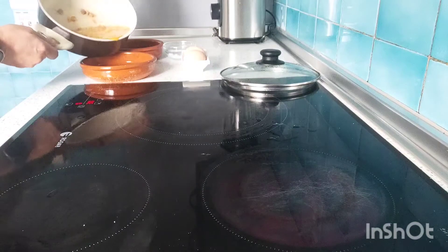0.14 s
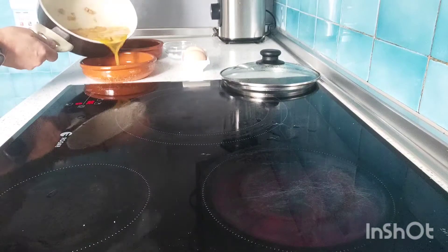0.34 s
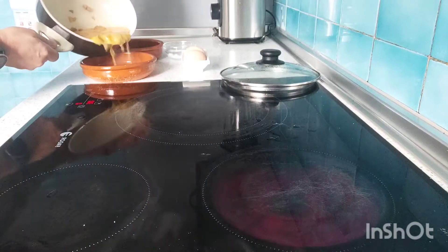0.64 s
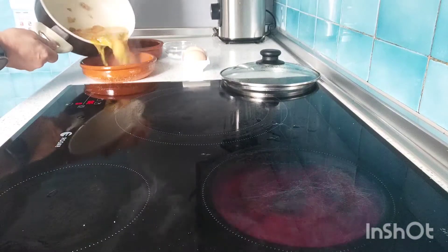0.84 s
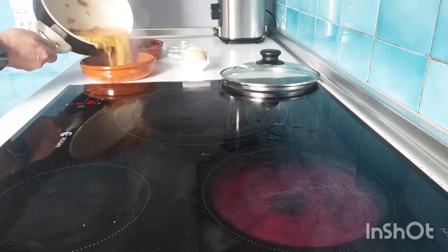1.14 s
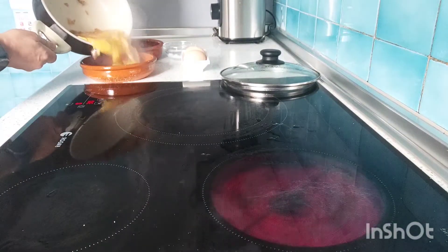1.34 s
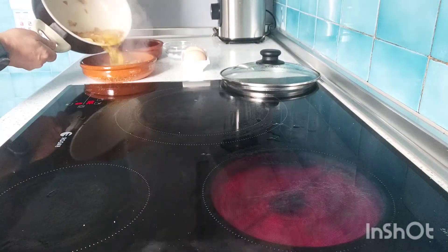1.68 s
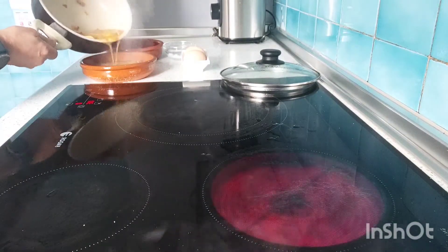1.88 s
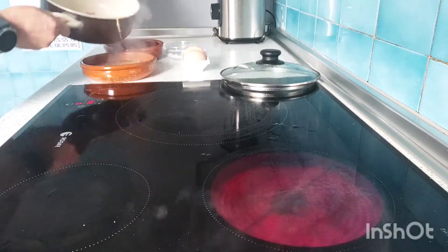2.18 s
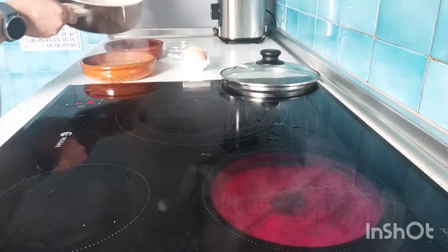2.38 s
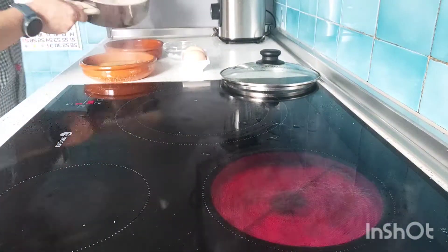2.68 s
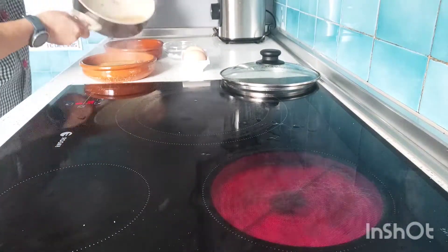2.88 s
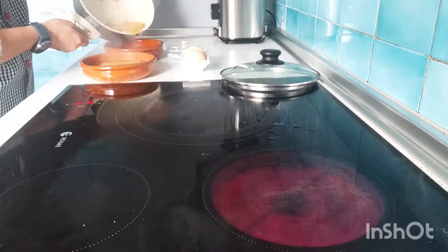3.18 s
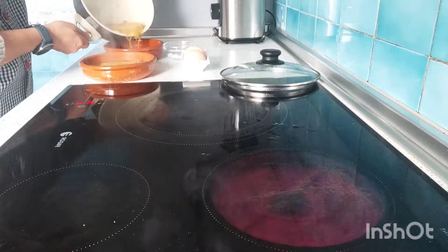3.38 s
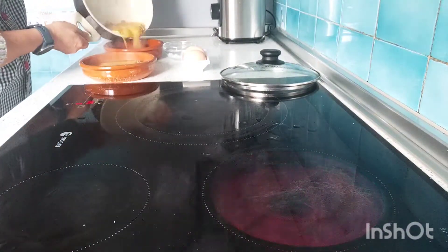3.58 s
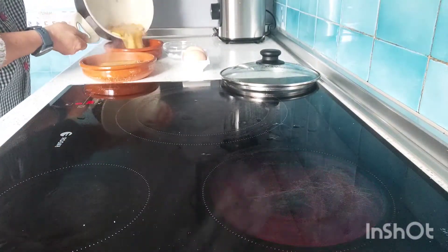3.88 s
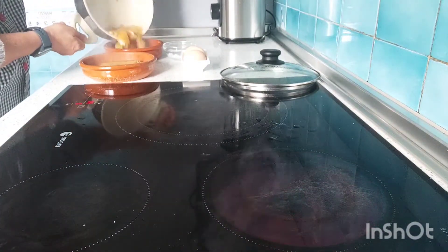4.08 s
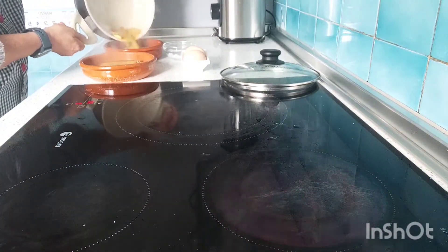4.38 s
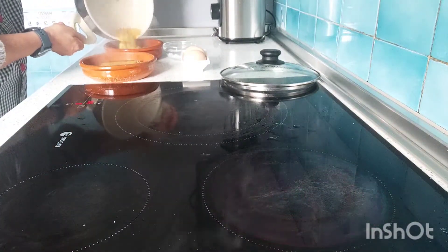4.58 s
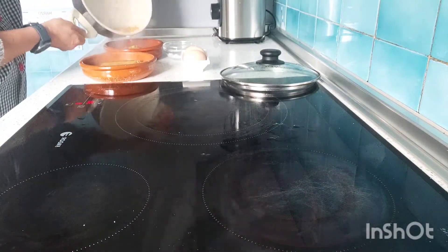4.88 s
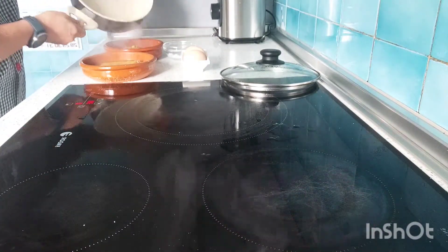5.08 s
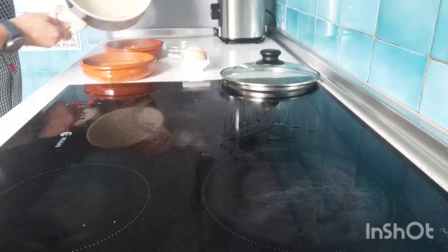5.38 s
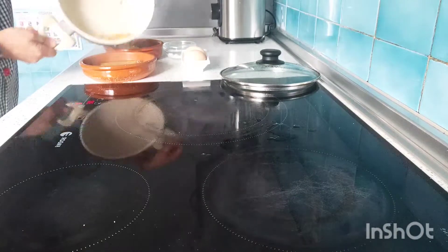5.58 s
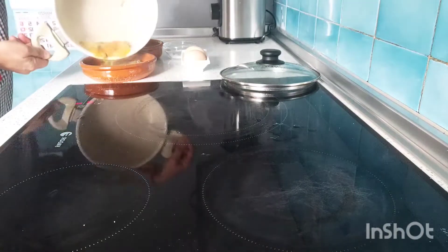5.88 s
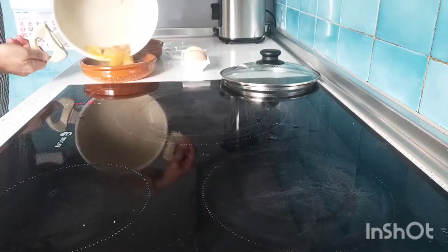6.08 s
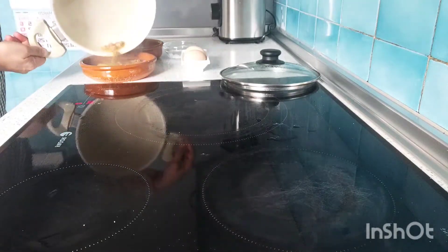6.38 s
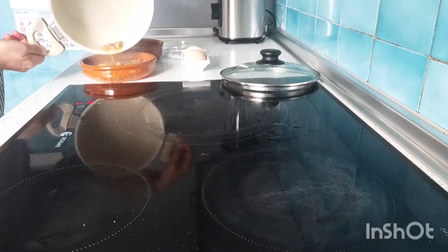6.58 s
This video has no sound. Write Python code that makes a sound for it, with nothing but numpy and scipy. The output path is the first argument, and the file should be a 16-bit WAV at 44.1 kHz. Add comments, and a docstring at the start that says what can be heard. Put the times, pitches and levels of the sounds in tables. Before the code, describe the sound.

In a small tiled kitchen with a faint airy rush and low hum, a pot knocks a clay dish and thick soup runs in with crackling, wet splats and little plops. Cloth swishes as the pot moves away, the pot rings softly, and the second dish is knocked. Two shorter, quieter pours follow. Stereo microphones sit a little way off across the hob, the thuds leaning left.

```python
"""Thick soup is tipped from a pot into two earthenware dishes on a kitchen worktop, heard in stereo from the hob.
Throughout, filtered noise gives a rush of air and wavering sines the hum of an appliance in the small tiled room.
Enveloped noise makes cloth swish; damped modes knock on the near dish and thud the worktop; bursts splat as lumps
land, clumped bursts and bubbles make the stream crackle, and sines of rising pitch plop. Near 2.9 s the pot rings
on its way to the far dish, which is knocked from 3.3 s; further pours reach full flow near 4 s and 6 s."""
import sys
import numpy as np
from scipy import signal
from scipy.fft import rfft, irfft, next_fast_len
from scipy.io import wavfile
from scipy.ndimage import map_coordinates

SR = 44100
rng = np.random.default_rng(int(sys.argv[2]) if len(sys.argv) > 2 else 0)


def wav_out(sig):
    """Save sig, one row per channel (or a flat mono array), as 16-bit PCM at SR to the path in sys.argv[1]."""
    wavfile.write(sys.argv[1], SR, np.round(np.clip(np.atleast_2d(sig).T, -1, 1) * 32767).astype(np.int16))


N = 297234
TIME = np.arange(N) / SR


def amp(db):
    """Logarithmic level: decibels to amplitude gain."""
    return 10 ** (np.asarray(db) / 20)


def unit(x):
    """Normalisation by mean power: scale to rms 1."""
    return x / np.sqrt(np.mean(x ** 2) + 1e-20)


def along(points, hz):
    """Logarithmic interpolation: read (f/Hz, value) points on a log-frequency axis."""
    f, values = np.transpose(points)
    return np.interp(np.log(hz + 1), np.log(f + 1), values)


def wobble(rate):
    """Band-limited random modulation: a smooth random curve with rate knots a second."""
    knots = rng.standard_normal(int(N * rate / SR) + 4)
    return map_coordinates(knots, [TIME * rate])


def filtered(x, response):
    """Linear filtering: multiply the spectrum of x by a complex response of frequency."""
    n = x.shape[-1]
    padded = next_fast_len(n + SR // 4)
    spectrum = rfft(x, padded) * response(np.fft.rfftfreq(padded, 1 / SR))
    return irfft(spectrum, padded)[..., :n]


def coloured(x, spectrum):
    """Spectral shaping: weight x by a spectrum in dB, then normalise to rms 1."""
    return unit(filtered(x, lambda hz: amp(along(spectrum, hz))))


def low_cut(hz, edge_hz):
    """Inefficient radiation: small bodies radiate no deep bass (second-order high-pass)."""
    return (1j * hz) ** 2 / (edge_hz ** 2 - hz ** 2 + 1j * hz * edge_hz)


def delay(hz, s):
    """Linear phase: the response of a pure delay of s seconds."""
    return np.exp(-2j * np.pi * hz * s)


def bending(hz, slow_s, fast_hz):
    """Dispersion: bending waves run slower the lower they are, with travel time falling as 1/sqrt(f).

    slow_s is the travel time at 200 Hz, from which that of the first arrival, fast_hz, is subtracted."""
    f = np.minimum(hz, fast_hz)
    return np.exp(-2j * np.pi * slow_s * np.sqrt(200) * (2 * np.sqrt(f) - f / np.sqrt(fast_hz)))


# interchannel coherence of diffuse sound: (f/Hz, left-right correlation)
COHERENCE = [(30, 0.16), (90, .9), (300, 0.77), (600, 0.22), (1400, 0), (15000, 0.13)]


def diffuse(size):
    """Diffuse field: stereo noise whose channels share a frequency-dependent correlation."""
    def mid_side(hz):
        half_angle = np.arccos(np.clip(along(COHERENCE, hz), -1, 1)) / 2
        return np.array([np.cos(half_angle), np.sin(half_angle)])
    mid, side = filtered(rng.standard_normal((2, size)), mid_side)
    return np.array([mid + side, mid - side])


def add(track, s, sound):
    """Superposition: mix a sound into the track at time s."""
    part = track[:, max(round(s * SR), 0):][:, :sound.shape[-1]]
    part += sound[..., :part.shape[1]]


# reverberation of the tiled kitchen: (f/Hz, t60/s)
REVERBERATION = [(100, 0.47), (260, 0.54), (700, 0.34), (2000, 0.59), (8000, 0.49), (15000, 0.46)]


def in_kitchen(x, wet_db, early_db):
    """Reverberation: direct sound, a dense early answer from tiles and hob, then the room's tail."""
    hz, t, noise = signal.stft(diffuse(size=SR // 2), SR, nperseg=256)
    decay = amp(-60 * t / along(REVERBERATION, hz)[:, None])
    tail = unit(signal.istft(noise * decay, SR, nperseg=256)[1])
    t = np.arange(tail.shape[1]) / SR
    early = unit(diffuse(size=len(t)) * amp(-60 * t / 0.061))
    late = tail * (1 - np.exp(-t / 0.0078))
    answer = (amp(wet_db) * late + amp(early_db) * early) / np.sqrt(len(t))
    return x + signal.fftconvolve(x * np.ones((2, 1)), answer, axes=1)[:, :x.shape[-1]]


def ring(modes, t):
    """Modal superposition: exponentially damped sines, at slightly new strengths for every blow."""
    return sum(amp(db + rng.standard_normal() - 60 * t / t60) * np.sin(2 * np.pi * hz * t)
               for hz, db, t60 in modes)


def droplets(count, spread_db):
    """Impulsive excitation: a stereo train of random impulses, mostly small, a few large."""
    out = np.zeros((2, N + 32))
    at, lag = rng.integers(0, N, count), rng.integers(0, 32, count)
    size = rng.standard_normal(count) * amp(spread_db * np.minimum(rng.exponential(size=count), 3))
    out[0, at], out[1, at + lag] = size, size
    return unit(out[:, :N])


def bubbles(t, hz, cycles, rise):
    """Bubble resonance: a damped sine, one row a bubble, rising in pitch as it opens; silent before t = 0."""
    turns = np.maximum(t, 0) * hz
    life = turns / cycles  # 1 when the bubble has decayed by 60 dB
    envelope = amp(-60 * life) * (1 - np.exp(-2 * turns))
    return envelope * np.sin(2 * np.pi * turns * (1 + rise * np.minimum(life, 1)))


SWELL_DB = 20  # attack and release times are the times to rise or fall by this much


def swell(s, db, attack_s, hold_s, release_s):
    """Exponential envelope: gain climbs steadily in dB to its top at time s, holds, and dies away."""
    away = np.maximum(s - TIME, 0) / attack_s + np.maximum(TIME - s - hold_s, 0) / release_s
    return amp(db - SWELL_DB * away)


# harmonics and neighbours of the appliance hum: (f/Hz, mean level/dB re rms 1)
HUM = [(100.5, -73), (200, -70.5), (301, -79), (400, -74.5), (487, -79.5)]
# power spectrum of the rush of air: (f/Hz, relative level/dB per Hz)
AIR = [(20, 8), (45, -4), (80, -2.5), (140, -8.5), (220, 3.5), (330, -4.5), (430, -4), (560, -12.5),
       (1000, -18), (2000, -27.5), (4000, -31), (9000, -41.5), (11000, -46.5), (16000, -70)]


def room_tone():
    """Stationary background: broadband air noise and a mains hum unsteady in level and phase."""
    hum = 0
    for hz, db in HUM:
        level = np.sqrt(2) * amp(db + 1.8 * wobble(3.16))
        hum = hum + level * np.sin(2 * np.pi * hz * TIME + 1.1 * wobble(3))
    return hum + amp(-61.5) * coloured(diffuse(size=N), AIR)


# a sleeve speeds up, then slides: (t/s of full speed, relative level/dB, attack/s, hold/s)
SWISHES = [(0.01, -58, 0.15, 0.016), (2.107, -51.5, 0.084, 0.013), (2.35, -67, .16, .06),
           (2.512, -61.5, 0.26, 0.028), (2.638, -54, 0.13, 0.029), (2.899, -55, 0.14, 0.069),
           (5.392, -73.5, 0.21, 0.19)]
# power spectrum of cloth rubbing: (f/Hz, relative level/dB per Hz)
CLOTH = [(200, -16), (900, -4.5), (3400, -1.5), (6000, 0), (8500, 0.5), (10500, -13), (15500, -18.5)]
# power spectrum of the rustling folds: (f/Hz, relative level/dB per Hz)
FOLDS = [(300, -58), (600, 4), (1200, 1.5), (2000, 9), (2600, 5.5), (3300, -8.5), (5000, -32)]
SETTLE_S = 0.19  # release of every swish


def clothes():
    """Friction noise: cloth slides over cloth; the faster it moves, the more its folds rustle lower down."""
    speed = np.max([swell(*swish, SETTLE_S) for swish in SWISHES], axis=0)
    rub = coloured(diffuse(size=N), CLOTH) * amp(1.3 * wobble(60))
    rustle = coloured(droplets(count=15000, spread_db=0), FOLDS)
    folds = unit(in_kitchen(rustle, wet_db=-2, early_db=1.0))
    catching = amp(1.8 * wobble(50))
    fold_gain = amp(-5.5) * (speed / speed.max()) ** 0.43
    return speed * (amp(-4.0) * rub + fold_gain * folds * catching)


# blows: (t/s, relative thud level/dB, thud f/Hz, relative clack level/dB, hardness f/Hz, dish 0 near / 1 far)
KNOCKS = [(0.160, -21.5, 229.5, -20, 1750, 0), (0.857, -22.5, 235, -27.5, 1760, 0),
          (1.344, -36, 229, -49.5, 1200, 0), (2.334, -47, 262, -74, 1000, 0),
          (3.273, -17.5, 210.3, -24, 1760, 1), (3.733, -30.5, 184, -44.5, 390, 1)]
# modes of the worktop: (f/Hz, relative level/dB, t60/s)
WORKTOP = [(120.9, -14.5, 0.47), (146.9, -15.5, 0.38), (184.2, -18, 0.25), (245, -10, 0.036),
           (311.5, -6, 0.062), (409.6, -6, 0.06), (474.6, -25, 0.18)]
# modes of the near dish: (f/Hz, relative level/dB, t60/s)
NEAR_DISH = [(982, -17, 0.054), (1074, -10, 0.052), (1123, -13, 0.035), (1145, -27, 0.039),
             (1737, -21.5, 0.039), (1794, -23.5, 0.035), (1880, -18.5, 0.031), (2730, -27, 0.0262)]
# modes of the far dish: (f/Hz, relative level/dB, t60/s)
FAR_DISH = [(750, -17, 0.15), (918, -23, 0.056), (1113, -12, 0.06), (1150, -13, 0.055),
            (1320, -11.5, 0.038), (1384, -7, 0.013), (1700, -17.5, 0.017), (2170, -19, 0.074),
            (2293, -26.5, 0.081), (3540, -21, 0.026), (5280, -22, .012)]
# spectrum of the crowded modes of the clay: (f/Hz, relative level/dB per Hz)
CLAY = [(500, -33), (800, -4), (1100, 9), (1500, 0.5), (2300, -18.5), (3200, -24), (7000, -12),
        (10000, -20)]


def clack_of(dish, t):
    """Modal radiation: a struck dish rings in distinct modes and in crowded, well-damped ones."""
    clay = coloured(rng.standard_normal(len(t)), CLAY)
    clay = clay * (1 - np.exp(-t / 0.00077)) * amp(-60 * t / 0.023)
    modes = ring(FAR_DISH if dish > .5 else NEAR_DISH, t)
    clack = filtered(modes + amp(-13.0) * clay, lambda hz: low_cut(hz, edge_hz=530))
    clack = filtered(clack, lambda hz: 1 + amp(-14.0) * delay(hz, .0107))  # the rim bounces once
    return filtered(clack, lambda hz: delay(hz, np.array([[.0004], [0]])))  # the left port hears it later


def thud_of(thud_hz, t):
    """Forced and free vibration: the worktop heaves a few times under the weight, then rings."""
    push = np.sin(2 * np.pi * thud_hz * t) * np.sin(np.pi * np.minimum(t / 0.014, 1))
    return filtered(push + ring(WORKTOP, t), lambda hz: low_cut(hz, edge_hz=172))


def knocks():
    """Impact and dispersion: each blow rings a dish and thuds the worktop, treble first and bass last."""
    out, t = np.zeros((2, N)), np.arange(int(.7 * SR)) / SR
    for s, thud_db, thud_hz, clack_db, hard_hz, dish in KNOCKS:
        clack = in_kitchen(clack_of(dish, t), wet_db=-3.0, early_db=3.5)
        thud = in_kitchen(thud_of(thud_hz, t), wet_db=-6.5, early_db=-27.0)
        blow = amp(clack_db) * clack + amp(thud_db - 5.5) * thud
        blow = filtered(blow, lambda hz: 1 / (1 + 1j * hz / hard_hz))  # a soft contact leaves out the high modes
        add(out, s, filtered(blow, lambda hz: bending(hz, slow_s=0.0111, fast_hz=2040)))
    return filtered(out, lambda hz: 1 / (1 + (hz / 9500) ** 8))  # porous clay swallows the highest treble


# the larger lumps land in the soup: (t/s, relative spray level/dB, body level/dB re spray column)
SPLATS = [(0.387, -40.5, -9), (0.601, -48, -6.5), (0.637, -47, -22), (0.9072, -44.5, -14),
          (1.054, -50, -10), (1.0923, -47.5, 3), (1.208, -48, -12), (1.2878, -32.5, -6.5), (1.384, -40, -8),
          (1.512, -45, -18), (1.629, -40.5, -9), (1.799, -53, 6), (1.894, -49.5, -4),
          (1.9885, -48.5, -10.5), (3.884, -45.5, -19.5), (3.9996, -44, -23), (4.122, -35.5, -18),
          (4.254, -44, -20), (4.4454, -45, -14), (4.515, -49, -23), (4.685, -45, -6), (4.694, -42, -10.5),
          (5.139, -55, -26), (6.0857, -48.5, -4.5), (6.2717, -46, -30), (6.3264, -47.5, -23),
          (6.393, -49, -7), (6.542, -52.5, 0.5)]


def splats():
    """Impact on a liquid: a lump slaps the surface and throws off a quickly fading spray of tiny bursts."""
    spray, body, t = np.zeros((1, N)), np.zeros((1, N)), np.arange(SR // 8) / SR
    fade = (1 - np.exp(-t / 0.0019)) * amp(-60 * t / 0.068)
    for s, db, body_db in SPLATS:
        add(spray, s, amp(db - 13) * fade)
        add(body, s, amp(db + body_db - 9.5) * fade)
    # spectra: (f/Hz, relative level/dB per Hz)
    fizz = coloured(droplets(count=60000, spread_db=1.5),
                    [(1200, -42), (3500, 4.5), (8000, 12.5), (10500, 0.0), (15500, -8.5)])
    slap = coloured(droplets(count=30000, spread_db=3.5),
                    [(400, -3), (1000, 14), (2500, 10.5), (4500, 12.5), (9000, -48)])
    return in_kitchen(spray * fizz + body * slap, wet_db=-4.0, early_db=-1.5)


def froth(count, centre_hz, spread_db):
    """Bubble ensemble: many small bubbles of all pitches, mostly faint, at rms 1."""
    t = np.arange(SR // 80) / SR
    hz = np.clip(centre_hz * np.exp(0.595 * rng.standard_normal((count, 1))), 900, 13000)
    size = amp(spread_db * np.minimum(rng.exponential(size=(count, 1)), 3))
    at = rng.integers(0, N, (count, 1)) + np.arange(len(t))
    sounds = size * bubbles(t, hz, cycles=44, rise=0.053)
    return unit(np.bincount(at.ravel(), sounds.ravel(), N)[:N])


LUMPS_PER_S, LUMP_SPREAD_DB, LUMP_T60_S = 45, 3, 0.15  # small pieces carried by the stream


def lumps():
    """Shot process: gain of rms 1 that jumps with every small piece that lands, then dies away."""
    lands = rng.random(N) < LUMPS_PER_S / SR
    size = amp(LUMP_SPREAD_DB * np.clip(rng.standard_normal(N), -2, 2))
    t = np.arange(SR // 4) / SR
    decay = amp(-60 * t / LUMP_T60_S)
    power = signal.fftconvolve(lands * size ** 2, decay ** 2)[:N]
    return unit(np.sqrt(np.abs(power)))


# the pot is tipped until the soup runs fully, held there, then eased back:
# (t/s of full flow, relative level/dB, tipping/s, hold/s, draining/s)
POURS = [(1.403, -60.5, 1.0, 0.066, 0.49), (3.968, -69, 0.59, 0.54, 0.15), (6.064, -66, 0.34, 0.097, 0.27)]
# power spectrum of the crackle: (f/Hz, relative level/dB per Hz)
WET = [(300, -16), (900, -16), (2000, -11), (4500, 4), (8000, 4.5), (10500, -8), (15500, -11)]


def stream():
    """Flow noise: the running soup crackles in uneven clumps and beats small bubbles into the dish."""
    flow = sum(swell(*pour) for pour in POURS)
    crackle = coloured(droplets(count=14000, spread_db=3.5), WET)
    bubbling = froth(count=6000, centre_hz=4685, spread_db=3.5)
    running = flow * lumps() * (amp(-11.0) * crackle + amp(-16) * bubbling)
    return in_kitchen(running, wet_db=-3.5, early_db=5)


# gulps of trapped air: (t/s, relative level/dB, starting pitch f/Hz)
PLOPS = [(1.092, -44, 1940), (1.29, -45.5, 1900), (1.424, -45.5, 1890), (1.698, -51.5, 2980),
         (4.237, -52.5, 1100), (4.469, -52, 1900), (4.47, -50.5, 3400), (4.502, -46.5, 4300),
         (6.134, -46.5, 1650), (6.138, -47, 1200), (6.302, -56, 1860)]


def plops():
    """Volume resonance: each gulp frees one large bubble, then smaller and larger ones on its heels."""
    out, t = np.zeros((2, N)), np.arange(SR // 8) / SR
    for s, db, hz in PLOPS:
        late = rng.uniform(0, .014, (5, 1))
        pitch = hz * np.exp(0.26 * rng.standard_normal((5, 1)))
        followers = bubbles(t - late, pitch, cycles=10.3, rise=0.12).sum(axis=0)
        first = bubbles(t, hz, cycles=20.4, rise=0.031)
        add(out, s, amp(db - 1.5) * (first + amp(-4.5) * followers))
    return in_kitchen(out, wet_db=-0.5, early_db=7.0)


# modes of the half-full pot: (f/Hz, relative level/dB, t60/s)
POT = [(265, -4, 0.28), (467, 2, 0.2), (657, 0, 0.19), (2080, -1, 0.056)]
BUMP_S, BUMP_DB = 2.92, -50  # the pot is jolted on its way to the far dish


def pot_bump():
    """Dispersed modal ringing: the half-full pot rings briefly, its high mode first."""
    out, t = np.zeros((1, N)), np.arange(SR // 2) / SR
    add(out, BUMP_S, amp(BUMP_DB) * ring(POT, t) * (1 - np.exp(-t / 0.0054)))
    spread = filtered(out, lambda hz: bending(hz, slow_s=.045, fast_hz=2100))
    return in_kitchen(spread, wet_db=-9.5, early_db=-8)


def scene():
    """Superposition of everything that sounds in the kitchen."""
    return room_tone() + clothes() + knocks() + splats() + stream() + plops() + pot_bump()


# channel balance: (f/Hz, left minus right level/dB)
BALANCE = [(30, 3.5), (120, 8), (500, 6), (900, 5.5), (1500, 0.5), (4000, -1.5), (11000, 0)]
# resonance of the left, then the right microphone port: (f/Hz, width f/Hz, peak level/dB)
PORTS = [(9120, 530, 17), (7660, 940, 14.5)]
TOP_HZ = 15800  # nothing passes from here up


def record(dry):
    """Port resonance: each microphone port has its own treble peak; the left one takes more bass."""
    def microphones(hz):
        ports = np.array([1 + (amp(db) - 1) * 1j * hz * width / (centre * centre - hz * hz + 1j * hz * width)
                          for centre, width, db in PORTS])
        return ports * amp(along(BALANCE, hz) * np.array([[.5], [-.5]]))
    return filtered(filtered(dry, microphones), lambda hz: hz < TOP_HZ)


dry = scene()
out = record(dry)
wav_out(out)
```